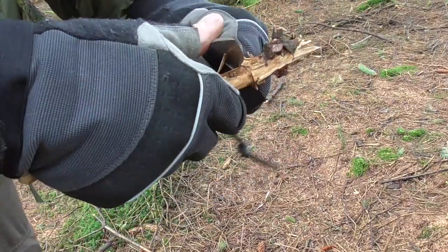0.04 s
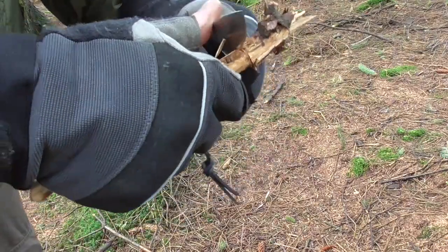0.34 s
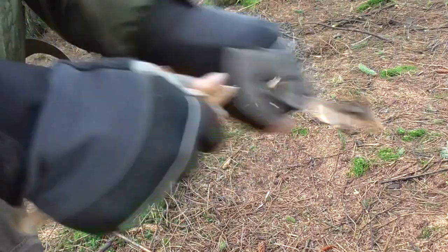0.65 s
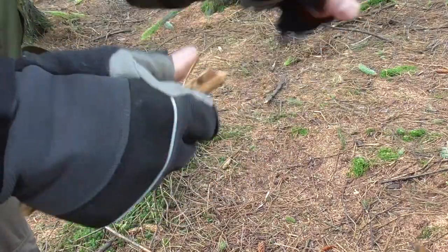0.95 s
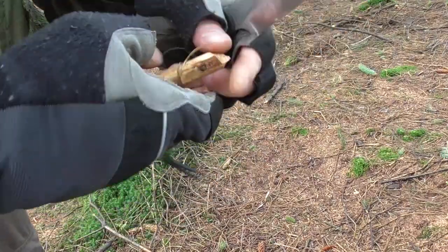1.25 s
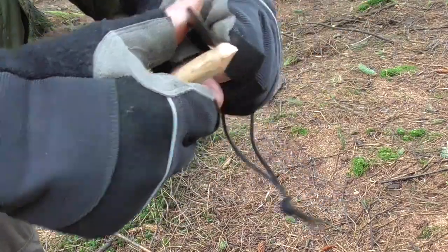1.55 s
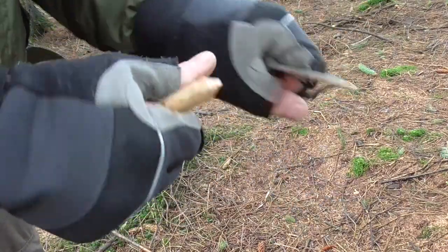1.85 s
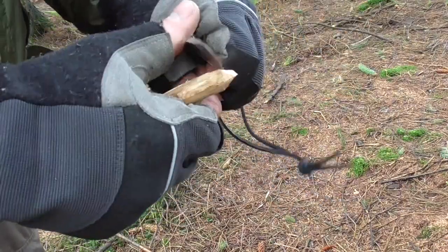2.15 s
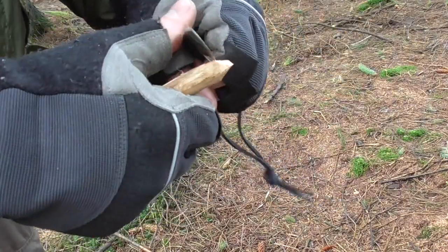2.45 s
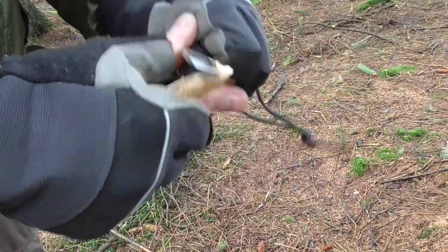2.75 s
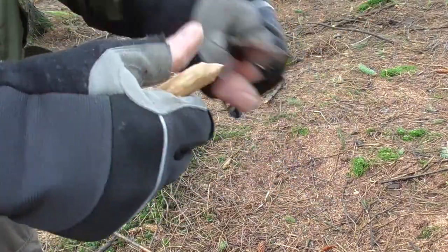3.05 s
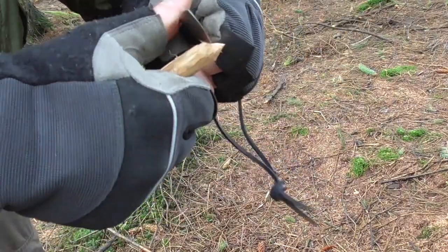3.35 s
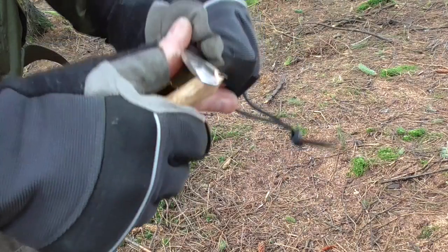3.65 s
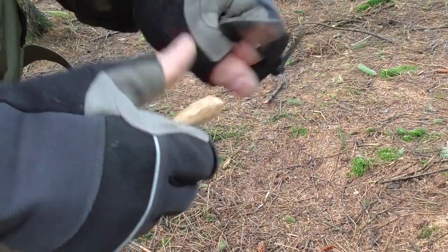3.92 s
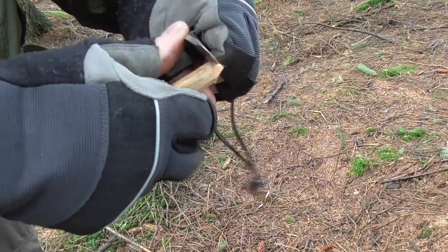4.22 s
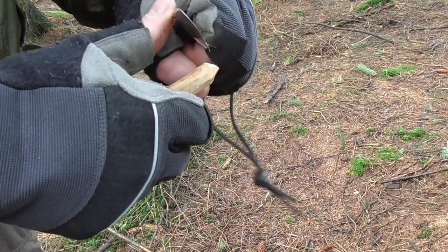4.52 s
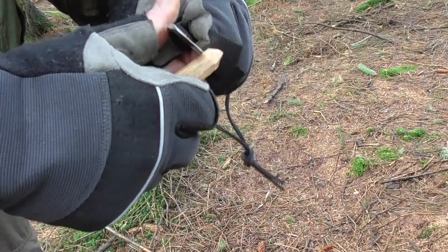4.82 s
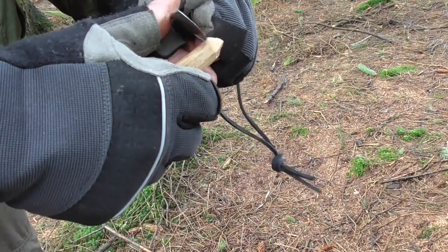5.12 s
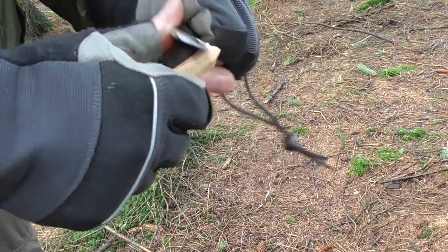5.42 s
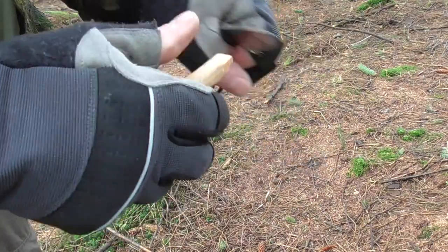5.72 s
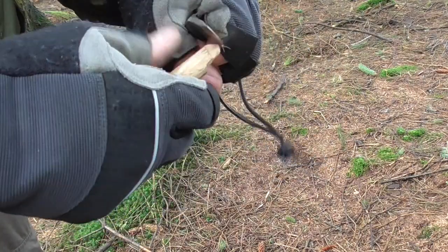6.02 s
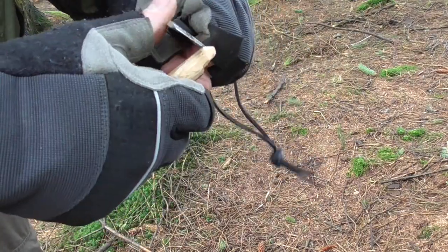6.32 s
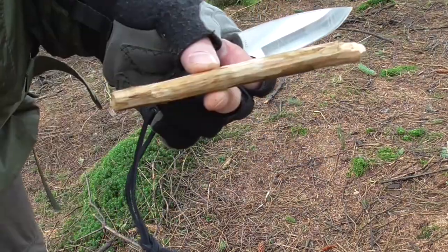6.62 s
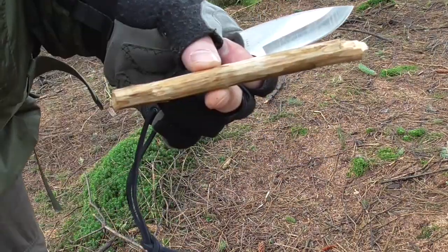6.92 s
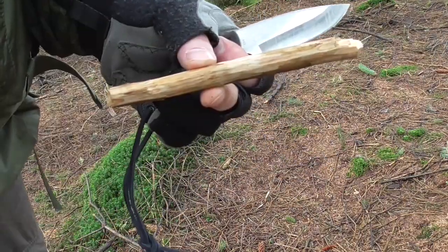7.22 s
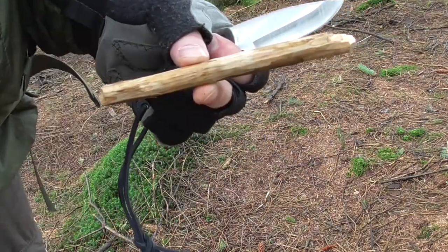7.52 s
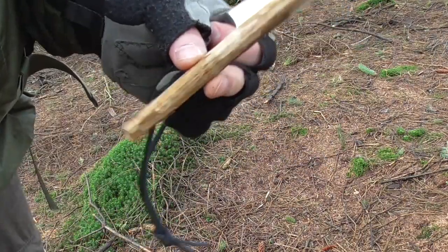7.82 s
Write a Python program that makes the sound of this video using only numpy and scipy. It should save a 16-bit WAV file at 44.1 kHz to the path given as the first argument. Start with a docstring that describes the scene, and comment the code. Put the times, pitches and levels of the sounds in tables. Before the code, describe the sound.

Close, separate knife strokes crack through a wooden stick outdoors, with gloves rubbing between them and faint birds in a steady hiss.

```python
"""In a wood, close by, a knife cuts five shavings from a stick.
In each stroke the blade tears through the fibres, which part in sharp snaps that knock the gripped stick.
The gloved hands jolt and rub, the blade squeaks faintly, and sleeves rustle with each push and swing.
Behind are faint far birds, puffs of wind on the microphone and a steady hiss."""
import sys
import numpy as np
from scipy import signal
from scipy.fft import rfft, irfft
from scipy.io import wavfile

SR = 44100
rng = np.random.default_rng(int(sys.argv[2]) if len(sys.argv) > 2 else 0)


def bounce(signal):
    """Save signal as a 16-bit WAV file at the path given by the first command-line argument."""
    frames = np.transpose(np.atleast_2d(signal))
    limited = np.clip(frames, -1, 1)
    pcm = np.round(limited * 32767).astype(np.int16)
    wavfile.write(sys.argv[1], SR, pcm)


N = 346626
TIME_S = np.arange(N) / SR


def knife(stick_left_db=2.0, splinters_right_db=2):
    """Stick, shaving and splinters sound together in each cut, each with its own reflections."""
    stick, shaving, splinters = (snap + slide for snap, slide in zip(snaps(), slices()))
    stick = low_cut(stick + jolts(), hz=45)
    stick = scatter(stick, near_db=-12, near_t60_s=.025, far_db=-25, far_t60_s=.4)
    shaving = scatter(shaving, near_db=-13, near_t60_s=.059, far_db=-22.5, far_t60_s=.84)
    splinters = scatter(splinters, near_db=-6.5, near_t60_s=.029, far_db=-26, far_t60_s=.39)
    lean = np.array([[.5], [-.5]])
    return stick * amp(stick_left_db * lean) + shaving + splinters * amp(-splinters_right_db * lean)


# modes of the gripped stick and the stiff shaving: (base frequency [Hz], width [Hz], gain [dB])
STICK_MODES = [(687, 495, 1), (1005, 320, 5), (1220, 470, -1.5)]
SHAVING_MODES = [(1770, 3700, -4.5), (2820, 220, -5.5), (3820, 580, 4), (4360, 270, 2.5)]
# tiny fibres tearing: (frequency [Hz], gain [dB])
FIZZ_SPECTRUM = [(2500, -34), (5000, 9.5), (6300, 5), (8200, 15), (9500, 13), (12600, 10.5), (14000, 8),
                 (16000, -20)]
# loudest fibre breaks: (time [s], stick knock [dB], shaving crack [dB])
FIBRE_SNAPS = [(.6736, -30, -23), (.7216, -32, -23), (.7228, -28, -29), (.7262, -40, -30), (.729, -50, -30),
               (.7378, -52, -20), (.739, -32, -21.5), (.7478, -51, -11.5), (.7492, -20, -26),
               (.7534, -44, -31), (1.1645, -35.5, -38), (1.7631, -25.5, -15), (1.7998, -24.5, -11),
               (1.8174, -43, -24), (1.8193, -23.5, -32), (1.832, -33, -24.5), (2.9165, -38, -16),
               (2.919, -36, -34), (2.923, -20.5, -44), (2.927, -28, -29), (3.7814, -50, -21.5),
               (3.7826, -14.5, -42), (3.7835, -21.5, -38), (3.7859, -14.5, -26), (3.7898, -33, -24),
               (5.466, -22.5, -32), (5.4948, -30.5, -30.5), (5.5064, -29, -41), (5.538, -24, -29.5),
               (5.5433, -22, -29), (5.5467, -32, -17), (5.5494, -23, -39), (5.561, -22.5, -34)]
def snaps(shaving_db=-1, splinter_db=-2, width_hz=850, pitch_spread=.017, grit_db=-5, grit_s=.00035):
    """Each snap knocks the stick, cracks the shaving and pings a tiny splinter amid a puff of grit."""
    stick, shaving, splinters = np.zeros(N), np.zeros(N), np.zeros((2, N))
    t = np.arange(300) / SR
    grit = colour(pair(*rng.standard_normal((2, N)), correlation=.39), FIZZ_SPECTRUM)
    puff = t / grit_s * np.exp(1 - t / grit_s)
    detunes = 1 + pitch_spread * rng.standard_normal(len(FIBRE_SNAPS))
    for (s, knock_db, crack_db), detune in zip(FIBRE_SNAPS, detunes):
        stick_pitch, shaving_pitch, brittle_db, hz = wood_at(s)
        ping_db = crack_db + brittle_db
        splinter_modes = [(hz * detune * .867, width_hz, 0), (hz * detune * 1.067, width_hz, -3)]
        grit_puff = puff * grit[:, round(s * SR):][:, :len(t)] / 2
        add(stick, s - .0002, amp(knock_db) * ring(STICK_MODES, stick_pitch))
        add(shaving, s, amp(crack_db + shaving_db) * ring(SHAVING_MODES, shaving_pitch))
        add(splinters, s, amp(ping_db + splinter_db) * ring(splinter_modes))
        add(splinters, s - grit_s, amp(ping_db + grit_db) * grit_puff)
    return stick, shaving, splinters


# slips and tears through the grain: (time [s], length [s], stick level [dB], shaving level [dB])
BLADE_SLIDES = [(.507, 0.005, -71, -52), (0.676, 0.0029, -40, -47), (0.702, 0.0024, -51, -39),
                (0.7187, .003, -40, -39), (.724, .023, -44, -54), (1.164, .003, -49, -46.5),
                (1.61, .002, -64, -58), (1.791, 0.0016, -43, -53), (1.81, 0.01, -40, -34.5),
                (2.763, .003, -64, -46.5), (2.781, 0.0056, -45.5, -47), (2.8145, 0.0021, -58, -43.5),
                (2.843, .002, -60, -56),(2.872, .002, -43, -46), (2.909, .0038, -46, -46),
                (2.914, 0.0046, -30.5, -29), (3.662, .012, -54, -48), (3.78, 0.00097, -25, -23),
                (5.542, 0.0056, -29.5, -27.5), (5.551, 0.021, -45, -45.5), (6.126, .002, -60, -52.5)]
def slices(fibres_per_s=4500, swell_db=5, attack_s=.00035, release_s=.0031, fizz_db=-2.5):
    """The sliding edge breaks thousands of fibres a second, harder towards the end of a slide."""
    out = np.zeros((3, N))
    breaks = rng.choice([-1., 1.], N) * rng.uniform(.38, 1, N)
    breaks *= rng.random(N) < fibres_per_s / SR
    curls = ring(SHAVING_MODES, pitch=.79) + ring(SHAVING_MODES, pitch=1.168)  # long curl, short curl
    stick = signal.oaconvolve(breaks, ring(STICK_MODES))
    shaving = signal.oaconvolve(breaks, curls)
    fizz = colour(breaks, FIZZ_SPECTRUM)
    for s, length_s, knock_db, crack_db in BLADE_SLIDES:
        _, _, brittle_db, _ = wood_at(s)
        levels_db = knock_db, crack_db, crack_db + brittle_db + fizz_db
        t = np.arange(int((length_s + .0077) * SR)) / SR
        push = amp(swell_db * (np.minimum(t / length_s, 1) - 1.5))
        push *= np.minimum(t / attack_s, 1) * np.exp(-np.maximum(t - length_s, 0) / release_s)
        push_rms = np.sqrt(np.mean(push ** 2))
        for track, voice, db in zip(out, (stick, shaving, fizz), levels_db):
            tear = unit(push * voice[round(s * SR):][:len(t)])
            add(track, s, amp(db) * push_rms * tear)
    return out


# knife pushes, two for the first shaving: (bite [s], end [s], stick pitch at bite [ratio], at end [ratio],
# shaving pitch [ratio], splinters re crack at bite [dB], at end [dB],
# splinter pitch at bite [Hz], at end [Hz])
KNIFE_PUSHES = [(0.67, 0.67, 1.2, 1.15, 0.91, 0, 0, 8900, 9100),
                (0.735, 0.749, 0.76, 0.87, 1.02, 10, 5.5, 12000, 10070),
                (1.803, 1.806, 1.57, 1.05, 0.96, -8, -3, 8900, 10400),
                (2.91, 2.93, 0.94, 0.84, 0.95, 0.5, -5, 11300, 9500),
                (3.78, 3.785, 0.53, 1.05, 1.01, -2.5, -12, 10200, 9800),
                (5.47, 5.573, 0.89, 1.05, 1.07, -3, 1.5, 9500, 9050)]
def wood_at(s):
    """The wood's pitch and brittleness change as the blade travels through the nearest push."""
    nearest = min(KNIFE_PUSHES, key=lambda row: abs(row[1] - s))
    bite_s, end_s, bite_pitch, end_pitch, shaving_pitch, bite_db, end_db, bite_hz, end_hz = nearest
    stick_pitch = np.interp(s, [bite_s, end_s], [bite_pitch, end_pitch])
    brittle_db = np.interp(s, [bite_s, end_s], [bite_db, end_db])
    splinter_hz = np.interp(s, [bite_s, end_s], [bite_hz, end_hz])
    return stick_pitch, shaving_pitch, brittle_db, splinter_hz


# modes of the hands: (frequency [Hz], width [Hz], gain [dB])
HAND_MODES = [(165, 72, -4.2), (326, 77, 0.17)]
# thumps: (time [s], peak [dB])
HAND_JOLTS = [(0.6722, -35), (.748, -32), (1.167, -34.5), (1.7634, -36), (1.8, -32.5), (1.8195, -34.5),
              (2.919, -30.5), (3.782, -30), (5.549, -36)]
def jolts():
    """The gloved hands thump dully as the blade bites or breaks free."""
    out = np.zeros(N)
    for s, db in HAND_JOLTS:
        add(out, s, amp(db) * ring(HAND_MODES))
    return out


# blade on wood: (time [s], length [s], start pitch [Hz], end pitch [Hz], level [dB])
BLADE_SQUEAKS = [(2.57, .065, 7900, 7900, -71), (2.69, .05, 7650, 8150, -69),
                 (2.868, 0.057, 7150, 8600, -62)]
def squeaks():
    """The pressed blade squeaks thinly on the wood."""
    return glides(BLADE_SQUEAKS, waver=.004)


# sleeve rustle and glove rub: (frequency [Hz], gain [dB])
CLOTH_SPECTRUM = [(300, 6), (1500, 1), (2500, 1), (3800, 5.5), (6200, -3.5), (8300, 5), (12000, -2.5),
                  (14500, -11), (16000, -31)]
GLOVE_SPECTRUM = [(50, -38), (130, -1), (280, -1), (420, -3), (800, -17.5), (2000, -57)]
# arm swings between cuts and shifts of grip: (time [s], length [s], level [dB])
ARM_SWINGS = [(.81, .03, -53), (.95, 0.26, -62), (1.17, .18, -58), (1.96, 0.075, -58), (3.04, 0.041, -59.5),
              (4.0, 0.35, -66), (5.78, 0.27, -65)]
GRIP_SHIFTS = [(.36, .06, -55), (1.155, 0.013, -54.5), (2.2, .3, -51), (3.9, 0.7, -56.5)]
def sleeves_and_gloves(lead_s=.14, push_s=.18, push_db=-62, work_end_s=5.7, settle_s=.88,
                       catches_per_s=6000, grain_db=3, cloth_db=1, flutter_db=2):
    """Sleeve threads catch and slip with each push and swing; the gloves rub dully on the wood."""
    pushes = [(end_s - lead_s, push_s, push_db) for _, end_s, *_ in KNIFE_PUSHES]
    fidget = np.exp(-np.maximum(TIME_S - work_end_s, 0) / settle_s)
    pushing = swells(pushes, attack_s=.12, release_s=.11)
    swinging = swells(ARM_SWINGS, attack_s=.03, release_s=.053)
    arm = np.hypot(np.hypot(pushing, swinging), amp(-70.5) * fidget)
    grip = np.hypot(swells(GRIP_SHIFTS, attack_s=.077, release_s=.06), amp(-61) * fidget)
    catches = rng.random(N) < catches_per_s / SR
    threads = rng.standard_normal((2, N)) * catches
    threads *= amp(grain_db * np.minimum(rng.exponential(1, N), 4))
    rustle = colour(pair(*threads, correlation=.25), CLOTH_SPECTRUM)
    rustle *= amp(cloth_db + flutter_db * drift(rate_hz=20))
    rub = colour(pair(*rng.standard_normal((2, N)), correlation=.92), GLOVE_SPECTRUM)
    return rustle * arm + rub * grip


# buffeting: (frequency [Hz], gain [dB])
EDDY_SPECTRUM = [(10, -24), (25, -9), (85, 6.5), (170, -6), (340, -19), (600, -34), (1300, -82)]
# puffs: (time [s], length [s], level [dB])
WIND_PUFFS = [(.02, 0.086, -59), (.62, 0.098, -44.5), (.92, 0.21, -43.5), (4.85, 0.15, -43.5),
              (6.76, 0.31, -56), (7.55, 0.17, -47)]
def wind(breeze_db=-75, lump_db=2):
    """Lumpy eddies push the two microphone channels in opposite directions."""
    eddies = colour(pair(*rng.standard_normal((2, N)), correlation=-.81), EDDY_SPECTRUM)
    strength = swells(WIND_PUFFS, attack_s=.067, release_s=.078) + amp(breeze_db)
    return eddies * strength * amp(lump_db * drift(rate_hz=14))


# nearer birds: (time [s], length [s], start pitch [Hz], end pitch [Hz], relative level [dB])
BIRD_CHIRPS = [(.28, 0.066, 4740, 4000, -65), (.87, 0.083, 3650, 5040, -59.5), (1.03, .07, 3030, 3640, -62),
               (1.47, .14, 4820, 4090, -64), (4.5, 0.19, 3630, 3540, -69), (4.84, 0.081, 3300, 3820, -66),
               (4.88, 0.073, 4290, 4210, -58.5), (5.15, 0.09, 4410, 4355, -67),
               (5.42, 0.087, 4000, 4380, -64), (5.98, 0.053, 4110, 4600, -61), (6.25, .07, 4400, 4690, -67),
               (6.42, .19, 4280, 3870, -71), (6.76, .12, 4200, 4400, -69), (7.26, 0.089, 4430, 4200, -69),
               (7.63, .12, 4040, 4250, -66), (7.77, 0.11, 4470, 4340, -61.5)]
def birds(gain_db=-5):
    """Far chirps, blurred by the trees."""
    chirps = glides(BIRD_CHIRPS + twitter(), waver=.013)
    return amp(gain_db) * scatter(chirps, near_db=2.5, near_t60_s=.056, far_db=-7, far_t60_s=.94)


def twitter(per_s=6, length_s=.097, hz=4180, spread_hz=400, relative_db=-72, spread_db=2):
    """Chirp rows for the farthest birds, at random times and pitches."""
    count = int(per_s * N / SR)
    starts_s = (np.arange(count) + rng.random(count)) / per_s
    return [(s, length_s, hz + spread_hz * start, hz + spread_hz * end, relative_db + spread_db * level)
            for s, (start, end, level) in zip(starts_s, rng.standard_normal((count, 3)))]


# outdoor hiss: (frequency [Hz], gain [dB])
AIR_SPECTRUM = [(20, -47), (32, -12), (165, -1.5), (260, -4), (850, -4.5), (1350, -10), (1810, -19),
                (2600, -22), (4080, -21), (5500, -30), (7300, -27.5), (9000, -30), (14300, -34.5),
                (16000, -45)]
# its left-right likeness: (frequency [Hz], correlation [0..1])
AIR_CORRELATION = [(60, 1), (380, 0.79), (700, 0.45), (1300, 0.27), (4400, 0.44), (8000, 0), (15000, 0)]
# its balance: (frequency [Hz], left minus right [dB])
AIR_BALANCE = [(60, -3), (110, -5), (200, -3), (380, -3.5), (700, 0.1), (1290, 3), (2380, 2.5), (4400, 0.5),
               (8120, -1.0), (15000, -2.5)]
def air(level_db=-51.5, swell_db=.08):
    """Steady outdoor hiss, alike in both ears in the bass and wide in the treble."""
    hz = np.fft.rfftfreq(N, 1 / SR)
    correlation = curve_at(AIR_CORRELATION, hz)
    balance_db = np.outer([.5, -.5], curve_at(AIR_BALANCE, hz))
    spectrum = pair(*rfft(rng.standard_normal((2, N))), correlation)
    spectrum *= amp(curve_at(AIR_SPECTRUM, hz) + balance_db) / np.sqrt(1 + correlation)
    hiss = irfft(spectrum, N)
    return hiss / hiss.mean(0).std() * amp(level_db + swell_db * drift(rate_hz=6.8))


def scatter(x, near_db, near_t60_s, far_db, far_t60_s, size=16000):
    """Arms and ground scatter the sound within milliseconds; the trees return a faint tail."""
    t = np.arange(size) / SR
    near, far = rng.standard_normal((2, 2, size)) * np.minimum(t / .0024, 1)
    near = amp(near_db) * unit(near * amp(-60 * t / near_t60_s))
    far = amp(far_db) * unit(far * amp(-60 * t / far_t60_s))
    echo = (near + far) / np.sqrt(size)
    return x + signal.oaconvolve(np.atleast_2d(x), echo, axes=1)[:, :N]


def ring(modes, pitch=1.0, size=2048):
    """Minimum-phase click response of damped modes, envelope peak 1."""
    bins_hz = abs(np.fft.fftfreq(size, 1 / SR))
    gain = sum(amp(db) / (1 + ((bins_hz - hz * pitch) / width_hz) ** 2) ** 1.5
               for hz, width_hz, db in modes)
    log_gain = np.log(gain + gain.max() * .00069)
    response = np.fft.ifft(np.exp(signal.hilbert(log_gain).conj())).real
    return response / abs(signal.hilbert(response)).max()


def glides(rows, waver, arch=.0157):
    """Thin tones that swell and fade while their pitch slides in a slight arch."""
    out = np.zeros(N)
    wobble = 1 + waver * drift(rate_hz=240)
    for s, length_s, start_hz, end_hz, db in rows:
        size = int(length_s * SR)
        hump = np.hanning(size)
        hz = np.linspace(start_hz, end_hz, size) * (1 + arch * hump)
        hz *= np.resize(wobble[int(s * SR):], size)
        add(out, s, amp(db) * 2 * hump * np.sin(2 * np.pi * np.cumsum(hz) / SR))
    return out


def swells(rows, attack_s, release_s):
    """Gain curve: each row rises, holds and dies away; overlaps add in power."""
    power = np.zeros(N)
    for s, length_s, db in rows:
        before = np.maximum(s - TIME_S, 0) / attack_s
        after = np.maximum(TIME_S - s - length_s, 0) / release_s
        power += (amp(db) * np.exp(-np.minimum(before + after, 20))) ** 2
    return np.sqrt(power)


def low_cut(x, hz):
    """Removes the deepest bass, which small things hardly radiate."""
    return signal.sosfilt(signal.butter(2, hz, "high", fs=SR, output="sos"), x)


def colour(x, spectrum):
    """Filters x by a spectrum table, to rms 1."""
    gain = amp(curve_at(spectrum, np.fft.rfftfreq(N, 1 / SR)))
    return unit(irfft(rfft(x) * gain, N))


def curve_at(points, hz):
    """Interpolates a table over log frequency."""
    points_hz, values = np.transpose(points)
    return np.interp(np.log(hz + 1), np.log(points_hz + 1), values)


def drift(rate_hz):
    """Random wander below about rate_hz, rms 1."""
    rolloff = 1 + (np.fft.rfftfreq(N, 1 / SR) / rate_hz) ** 4
    return unit(irfft(rfft(rng.standard_normal(N)) / rolloff, N))


def pair(a, b, correlation):
    """Left and right from two unrelated signals."""
    mid, side = np.sqrt((1 + correlation) / 2) * a, np.sqrt((1 - correlation) / 2) * b
    return np.array([mid + side, mid - side])


def add(mix, s, sound):
    part = mix[..., round(s * SR):][..., :sound.shape[-1]]
    part += sound[..., :part.shape[-1]]


def amp(db):
    return 10 ** (np.asarray(db) / 20)


def unit(x):
    return x / np.sqrt(np.mean(x ** 2) + 1e-20)


def scene():
    return knife() + squeaks() + sleeves_and_gloves() + wind() + air() + birds()


def record(dry, edge_hz=16000):
    """Low-pass band limit."""
    taps = signal.firwin(401, edge_hz, window=("kaiser", 9), fs=SR)
    return signal.oaconvolve(dry, taps[None], "same")


dry = scene()
out = record(dry)
bounce(out)
```